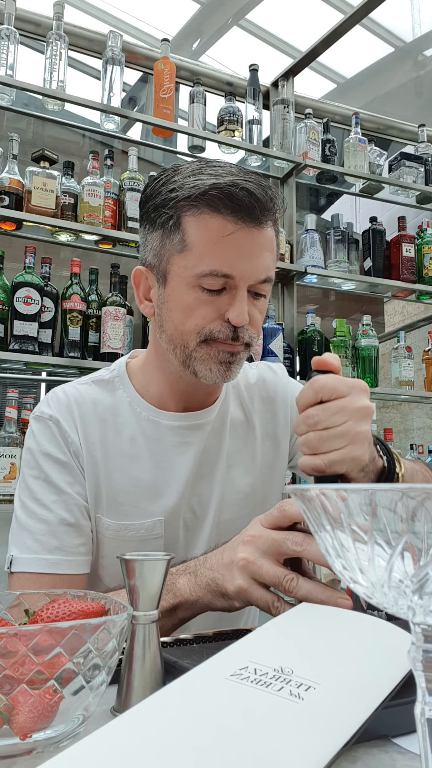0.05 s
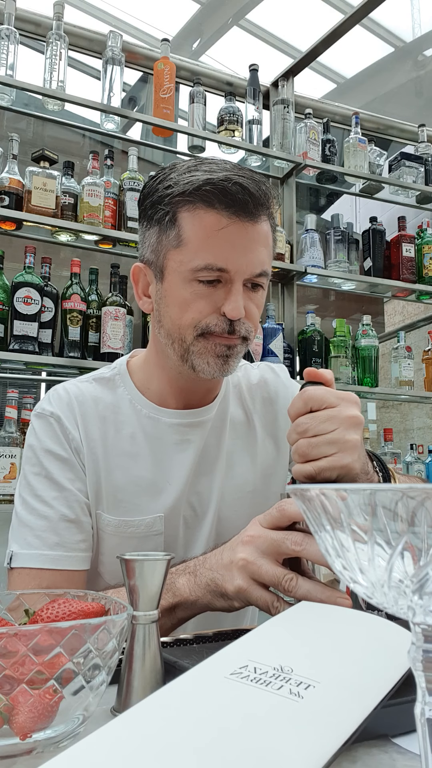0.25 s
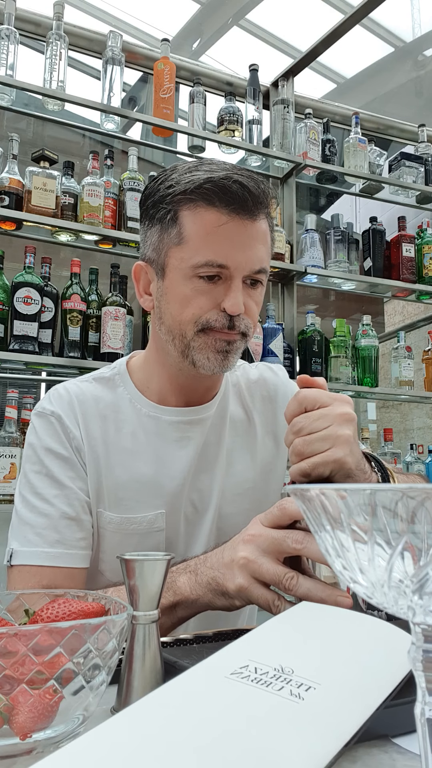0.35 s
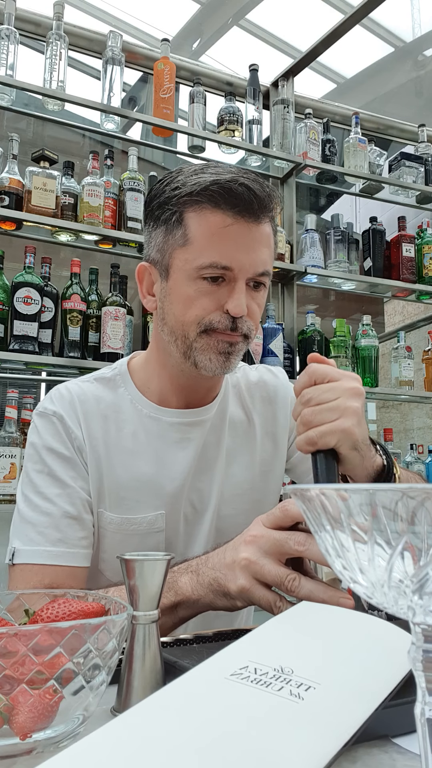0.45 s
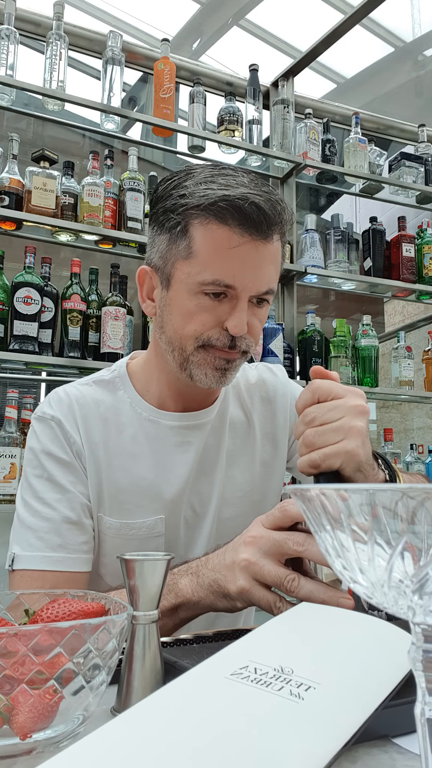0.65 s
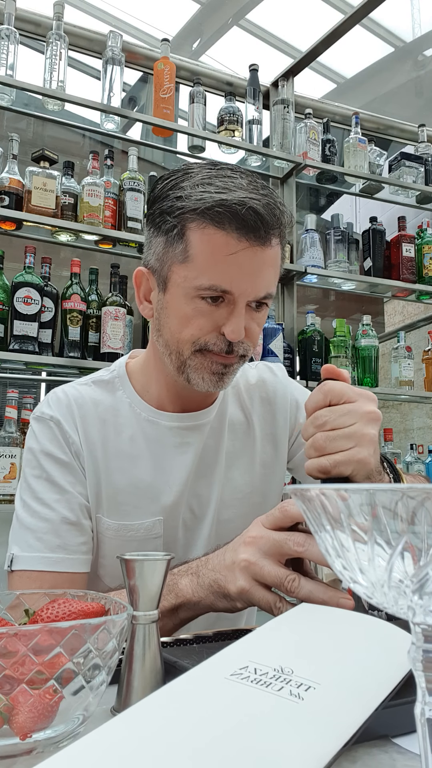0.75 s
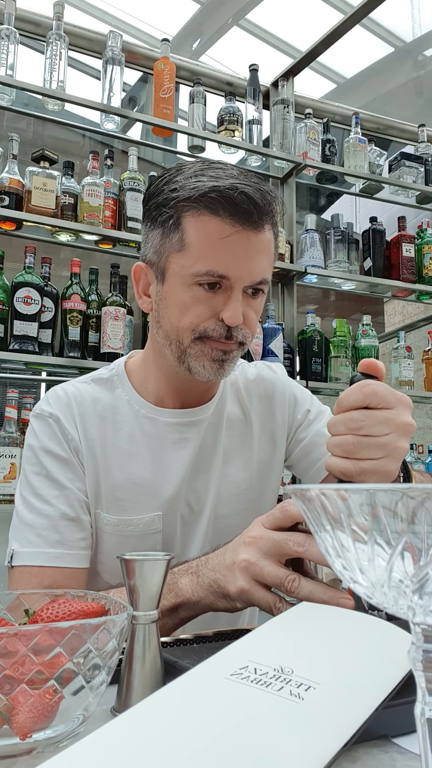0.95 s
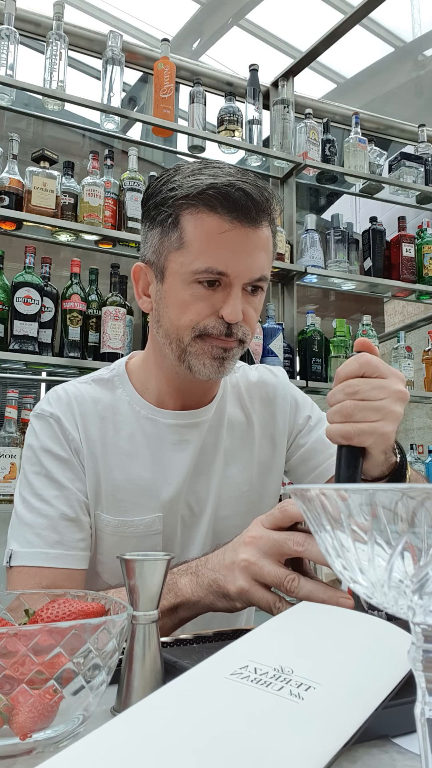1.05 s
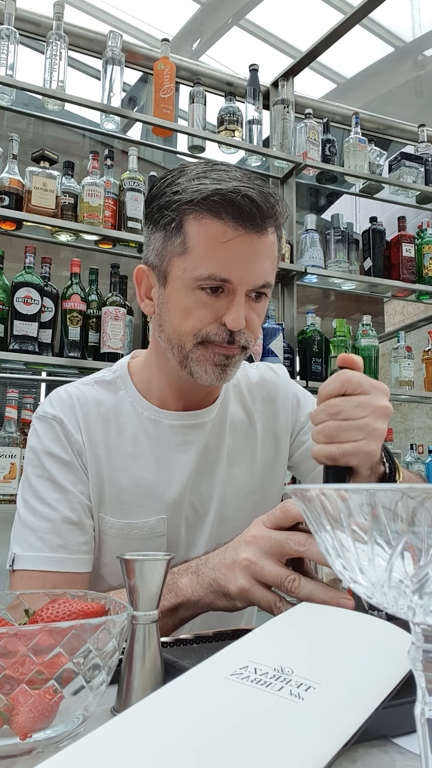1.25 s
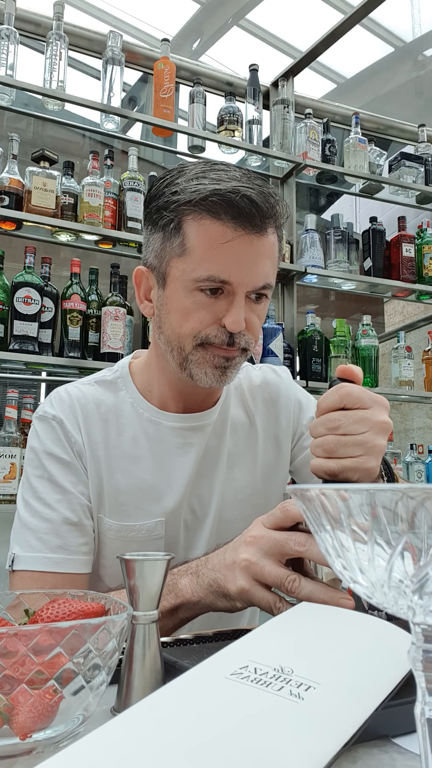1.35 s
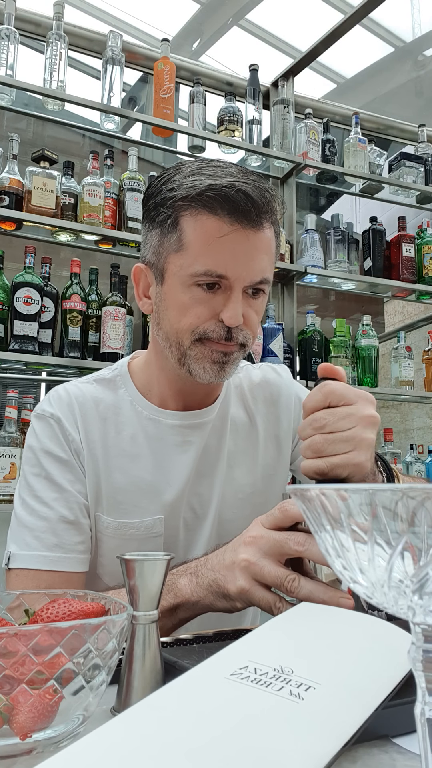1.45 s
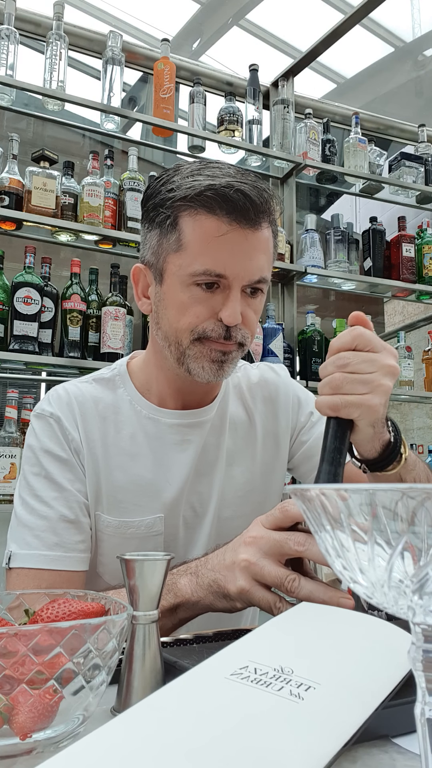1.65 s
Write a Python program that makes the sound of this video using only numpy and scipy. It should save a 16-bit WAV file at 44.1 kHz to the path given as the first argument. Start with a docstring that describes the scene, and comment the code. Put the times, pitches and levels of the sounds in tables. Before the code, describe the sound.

A muddler crushes fruit in a mixing vessel, close and to the right. Light taps at 0.2 seconds lead to a sharp knock at 0.35, a brief squeaky scrape, and the loudest, hollow knock at 0.6. Softer wet taps and low thumps follow from 0.8 to 1.25 seconds, then a soft grinding hiss until about 1.7. A fridge hums faintly in the slightly echoing room.

```python
"""Muddling fruit at a bar

A muddler pounds and grinds strawberries and leaves in a hand-held mixing vessel on a bar counter.
Each impact cracks against the wall and excites its modes and the air cavity; hard pushes thump the
counter, and handling adds a soft rumble. Between knocks, the tool rubs the wet pulp and scrapes the
wall. A fridge hums in the lively room."""
import sys
import numpy as np
from scipy import signal
from scipy.fft import rfft, irfft, next_fast_len
from scipy.io import wavfile

SR = 44100
rng = np.random.default_rng(int(sys.argv[2]) if len(sys.argv) > 2 else 0)


def waveform_to_disk(signal):
    """Save audio, clipped to [-1, 1], as 16-bit WAV at the path in sys.argv[1]."""
    frames = np.transpose(np.atleast_2d(signal))
    scaled = np.clip(frames, -1, 1) * 32767
    samples = np.round(scaled).astype(np.int16)
    wavfile.write(sys.argv[1], SR, samples)


N = 74970
T = np.arange(N) / SR

# Impacts: (time [s], crack level [dB], crack tilt [dB/octave], contact resonance [Hz], snap level [dB],
# cavity level [dB], cavity pitch [Hz], pitch sag [octaves/s], base and squash level [dB])
KNOCKS = [(0.217, -26, -3.5, 1620, -19.5, -20.5, 795, 7.5, -34),
          (0.2520, -27, -6, 2050, -24, -28, 772, -1.5, -31),
          (0.341, -14, 3.5, 3360, -24, -10, 862, 46.5, -13.5),
          (0.3812, -27.5, -5.5, 2800, -52, -24, 833, 14, -25.5),
          (0.4425, -30, 7.5, 2540, -37, -22.5, 788, 9.5, -29),
          (0.5821, -7.5, -2, 1230, -17.5, 4, 802, 0.5, -13.5),
          (0.8125, -32, -5.5, 1130, -38.5, -22, 768, 7.5, -32),
          (0.869, -26.5, -3, 3150, -25.5, -36, 747, 6.5, -36),
          (0.964, -28, -4.5, 1710, -48, -34.5, 862, 23, -55),
          (1.0567, -62, 7, 6000, -33, -62, 805, -24, -59),
          (1.1023, -26.5, -4.5, 1580, -41, -23, 840, 8.5, -28),
          (1.2330, -28.5, 1.5, 4570, -22.5, -20.5, 763, -6, -53),
          (1.2515, -25.5, 6, 4350, -18, -14, 762, -1.5, -31.5)]
# Damped modes of the vessel's base: (frequency [Hz], level [dB], T60 [s])
BASE_MODES = [(354, -13.5, 0.029), (459, -2, 0.0486)]
# Spectra of the crack, the wet snap and the fruit giving way: (frequency [Hz], gain [dB])
CRACK_SPECTRUM = [(300, -15), (900, 0), (1300, -10.5), (1600, 7.5), (2100, 0), (2800, 2), (4400, 1.5),
                  (5600, -1.5), (6600, -2), (8200, -14), (16000, -43)]
SNAP_SPECTRUM = [(3000, -20.5), (6500, -4), (8200, -11.5), (10000, -11.5), (12500, -0.5), (15500, -0.5)]
SQUASH_SPECTRUM = [(80, 0.5), (180, 10), (480, 9.5), (620, 5.5), (1050, 3), (1350, 1), (3000, -43)]
CONTACT_DB, CONTACT_SPAN = 6.5, 1.276   # lift at the resonance; frequency ratio to its edges
WALL_DB, CAVITY_LAG_S = -17.5, 0.00248


def knocks():
    """Impact excitation: a blow drives wall, base and cavity, and crushed fruit adds bursts of noise."""
    out, snaps, squashes = np.zeros((3, N))
    base = sum(from_db(db) * tone(hz, t60) for hz, db, t60 in BASE_MODES)
    wet_decay = decay(t60=0.014) + from_db(-16.5) * decay(t60=0.14)   # snap, then splatter
    for s, crack_db, tilt, contact_hz, snap_db, cavity_db, cavity_hz, sag, base_db in KNOCKS:
        crack_noise, snap_noise, squash_noise = rng.standard_normal((3, N))
        crack = coloured(crack_noise * decay(t60=0.024), CRACK_SPECTRUM)
        crack += from_db(WALL_DB) * wall_ring()
        contact = [(contact_hz / CONTACT_SPAN, 0), (contact_hz, CONTACT_DB),
                   (contact_hz * CONTACT_SPAN, 0)]
        crack = coloured(crack, [(1400, -tilt), (5600, tilt)], contact)
        note = delayed(cavity(cavity_hz, sag), CAVITY_LAG_S)
        out += delayed(from_db(crack_db) * crack + from_db(cavity_db) * note + from_db(base_db) * base, s)
        snaps += from_db(snap_db) * delayed(snap_noise * wet_decay, s)
        squashes += from_db(base_db) * delayed(squash_noise * decay(t60=0.034), s)
    return out + coloured(snaps, SNAP_SPECTRUM) + coloured(squashes, SQUASH_SPECTRUM)


def cavity(hz, sag, rise_s=0.0033, damping=0.65):
    """Cavity resonance: the air swells into a note that sags and chokes if the tool sinks into fruit."""
    octaves = np.clip(sag * T, 0, 4)
    phase = 2 * np.pi * np.cumsum(hz * 2 ** -octaves) / SR
    swell = (1 - np.exp(-T / rise_s)) * np.exp(-damping * octaves ** 2)
    main_mode = np.sin(phase) * decay(t60=0.046)
    lower_mode = from_db(-17) * np.sin(0.9 * phase) * decay(t60=0.11)
    return swell * (main_mode + lower_mode)


# Modes of the vessel's wall: (frequency [Hz], level [dB], T60 [s])
WALL_MODES = [(1480, -3, .05), (1620, -3, .03), (1810, -12, .08), (2290, -11, .08), (2546, -4, .09),
              (2615, -4, .08), (2736, -4, .07), (2970, -8, .04), (3613, -7, .05), (4165, 0, .07),
              (4665, -9, .07), (5020, -9, .04), (5780, -14, .05), (6400, -9, .03)]


def wall_ring(uneven_db=1.5, detune=0.0061):
    """Modal superposition: the contact point weights each mode, and pulp on the wall detunes it."""
    ring = 0
    for hz, db, t60 in WALL_MODES:
        gain = from_db(db + uneven_db * rng.normal()) * rng.choice([-1, 1])
        ring += gain * tone(hz * (1 + detune * rng.normal()), t60)
    return ring


# Low thumps: (time [s], level [dB], frequency [Hz], T60 [s])
THUMPS = [(0.35, -20.5, 145, 0.064), (0.3780, -33.5, 100, 0.23), (0.5840, -28, 166.5, 0.2),
          (0.815, -27, 173, .07), (1.102, -38, 84.4, .4), (1.1400, -37.5, 105.3, 0.39)]


def low_thumps():
    """Damped vibration: pushes on the counter, then a soft, longer handling rumble near 1.1 s."""
    return sum(from_db(db) * delayed(tone(hz, t60), s) for s, db, hz, t60 in THUMPS)


# Course of the rubbing: (time [s], rub level [dB], fizz level [dB])
RUB_LEVELS = [(0, -45, -49), (0.049, -43, -47), (.15, -51, -48.5), (.2, -50, -58), (.32, -56, -60),
              (.4, -44.5, -47), (.5, -67, -61), (.75, -56.5, -73), (.86, -59, -66), (.92, -50.5, -73),
              (1.03, -84, -66), (1.2, -59.5, -88), (1.28, -46.5, -58), (1.42, -64, -77), (1.7, -69, -75)]
# Spectra of rubbed pulp, bursting cells and juice: (frequency [Hz], gain [dB])
PULP_SPECTRUM = [(150, -34), (450, 10), (800, 18), (1150, 7.5), (2200, 9), (2900, 8.5), (3400, 1.5),
                 (4300, 3.5), (5200, -1), (7200, -1.5), (8600, -17), (15000, -23.5)]
CRACKLE_SPECTRUM = [(800, -17), (2500, 2.5), (4500, 0), (6800, 5.5), (9000, -19), (15000, -6.5)]
JUICE_SPECTRUM = [(5000, -88), (8500, -26), (10500, -1), (12500, 1), (15500, 3)]


def pulp():
    """Shot noise: tiny clicks add up as fruit and leaves rub, cells burst and juice fizzes."""
    times, rub_db, fizz_db = np.transpose(RUB_LEVELS)
    rub_level = envelope(times, rub_db)
    crackle = from_db(-3.5) * coloured(grains(per_s=220) * rub_level, CRACKLE_SPECTRUM)
    rub = coloured(grains(per_s=5000) * rub_level, PULP_SPECTRUM)
    fizz = coloured(grains(per_s=5000) * envelope(times, fizz_db), JUICE_SPECTRUM)
    return rub + crackle + fizz


# Strokes along the wall: (peak time [s], rise [s], fall [s], level [dB], squeak frequency [Hz])
SCRAPES = [(.04, 0.013, 0.018, -46, 803), (.05, 0.061, 0.067, -53, 2930), (.38, 0.0093, 0.024, -46, 4700),
           (0.426, 0.0069, 0.0018, -33, 1530), (.434, 0.018, .011, -38, 2387),
           (.433, 0.0032, 0.0061, -35, 4093), (.505, 0.02, .03, -59, 2580),
           (0.983, 0.0034, 0.017, -51.5, 1770)]


def scrapes(linewidth_hz=35, rasp_db=-3):
    """Stick-slip friction: each stroke squeaks on one resonance, over a rasp of dense slips."""
    out = 0
    for s, rise, fall, db, hz in SCRAPES:
        width = np.where(T < s, rise, fall)
        pressure = from_db(db) * np.exp(-.5 * ((T - s) / width) ** 2)
        phase_drift = np.cumsum(rng.standard_normal(N)) * np.sqrt(2 * np.pi * linewidth_hz / SR)
        squeak = np.sqrt(2) * np.sin(2 * np.pi * hz * T + phase_drift)
        rasp = coloured(pressure * grains(per_s=1800), PULP_SPECTRUM)
        out += pressure * squeak + from_db(rasp_db) * rasp
    return out


# Course of the twisting hiss: (time [s], level [dB])
TWIST_LEVELS = [(1.2, -60), (1.33, -49.5), (1.45, -47.5), (1.56, -50), (1.7, -51)]
# Its spectrum: (frequency [Hz], gain [dB])
TWIST_SPECTRUM = [(300, -11), (750, 7), (1150, -10.5), (2100, 0.5), (2900, 6.5), (3300, -3.5), (4300, -2.5),
                  (5200, -3), (6000, -5.5), (7700, 1.5), (8600, -25.5), (15000, -18)]


def twist():
    """Sliding friction: a soft, even hiss as the tool turns in the mash."""
    return coloured(rng.standard_normal(N) * envelope(*np.transpose(TWIST_LEVELS)), TWIST_SPECTRUM)


# Course of the hum: (time [s], level [dB])
HUM_LEVELS = [(0.0, -38), (0.084, -36), (0.316, -35.5), (0.378, -41), (0.866, -38), (1.116, -53),
              (1.174, -50), (1.296, -41.5), (1.472, -44), (1.7, -56)]
# Its partials: (multiple of the shaft rate, level [dB])
HUM_PARTIALS = [(2, 0), (3, -15.5), (4, -25), (6, -36.5), (7, -20), (8, -25.5), (9, -23.5)]


def fridge(shaft_hz=23.35):
    """Periodic forcing: a compressor hums on harmonics of its shaft rate."""
    hum = sum(from_db(db) * np.sin(2 * np.pi * (k * shaft_hz * T + rng.random()))
              for k, db in HUM_PARTIALS)
    return envelope(*np.transpose(HUM_LEVELS)) * np.sqrt(2) * hum


# Reverberation times of the room: (frequency [Hz], T60 [s])
ROOM_T60 = [(100, 0.92), (400, 0.57), (800, 0.54), (2000, 0.51), (5000, 0.53), (10000, 0.41), (15000, 0.38)]


def room(x, delay_s=0.0043, rise_s=0.0043):
    """Reverberation: convolution with a diffuse tail that dies sooner in the treble."""
    noise = rfft(diffuse())
    hz = np.arange(noise.shape[1]) * SR / N
    tail = 0
    for k, (_, t60) in enumerate(ROOM_T60):
        band = at_hz([(f, j == k) for j, (f, _) in enumerate(ROOM_T60)], hz)
        tail += irfft(noise * band, N) * decay(t60)
    tail *= np.clip((T - delay_s) / rise_s, 0, 1)
    return signal.fftconvolve(x[None], tail / np.linalg.norm(tail[1]), axes=1)[:, :N]


# Coherence of the diffuse field: (frequency [Hz], left-right correlation)
COHERENCE = [(60, 1), (300, 0.99), (700, 0.78), (1500, 0.033), (12000, 0.016)]


def diffuse():
    """Spatial coherence: white stereo noise, alike in the bass and unrelated in the treble."""
    mid, side = rfft(rng.standard_normal((2, N)))
    alike = at_hz(COHERENCE, np.arange(len(mid)) * SR / N)
    return irfft(np.sqrt(1 + alike) * mid + np.sqrt(1 - alike) * side * [[1], [-1]], N) / np.sqrt(2)


def from_db(db):
    """Amplitude ratio of a level in decibels."""
    return 10 ** (np.asarray(db) / 20)


def envelope(times, db):
    """Amplitude envelope, interpolated in decibels."""
    return from_db(np.interp(T, times, db))


def at_hz(points, hz):
    """Interpolation on a log-frequency axis."""
    f, value = np.transpose(points)
    return np.interp(np.log(np.maximum(hz, 1)), np.log(f), value)


def coloured(x, *responses):
    """Minimum-phase filtering by a cascade of (frequency [Hz], gain [dB]) responses."""
    size = 2 * next_fast_len(N // 2 + SR // 10, real=True)
    hz = np.arange(size // 2 + 1) * SR / size
    gain = from_db(sum(at_hz(points, hz) for points in responses))
    cepstrum = irfft(np.log(gain))
    cepstrum[1:size // 2] *= 2   # folding onto positive time makes the filter causal
    cepstrum[size // 2 + 1:] = 0
    return irfft(rfft(x, size) * np.exp(rfft(cepstrum)))[..., :N]


def decay(t60):
    """Exponential decay by 60 dB in t60 seconds."""
    return np.exp(-np.log(1000) * np.minimum(T / t60, 10))


def tone(hz, t60):
    """Impulse response of one damped mode."""
    return np.sin(2 * np.pi * hz * T) * decay(t60)


def delayed(x, s):
    """Pure delay of s seconds."""
    return np.pad(x, (round(s * SR), 0))[:N]


def grains(per_s, spread_db=4):
    """Poisson process: random clicks of uneven size, at unit rms."""
    sizes = from_db(spread_db * np.minimum(rng.exponential(1, N), 4)) * rng.choice([-1, 1], N)
    clicks = sizes * (rng.random(N) < per_s / SR)
    return clicks / np.sqrt(np.mean(clicks ** 2) + 1e-20)


# Responses of the direct and indirect paths to the left, and the far wall: (frequency [Hz], gain [dB])
LEFT_DIRECT = [(60, -9), (150, -2.5), (400, -4), (800, -10.5), (1400, -10), (2700, -14.5), (5000, -9.5),
               (9000, -20.5), (13000, -22)]
LEFT_INDIRECT = [(60, -4.5), (200, -3.5), (400, 0), (800, -14), (1400, -1), (2700, -6), (5000, -7),
                 (9000, -4.5), (13000, -13)]
FAR_WALL = [(300, 4), (800, -7), (1500, -4), (6000, -10)]
# Spectrum of the room's background noise: (frequency [Hz], gain [dB])
AMBIENT_SPECTRUM = [(25, -31), (60, 9), (100, -1.5), (180, -3), (300, -5.5), (500, -17), (900, -21),
                    (2000, -32.5), (4500, -44), (7500, -53), (9500, -52), (15000, -44)]


def scene():
    """Superposition: the vessel close by on the right, two reflections, the room and the fridge."""
    vessel = knocks() + low_thumps() + scrapes() + pulp() + twist()
    counter_echo = from_db(-9) * coloured(delayed(vessel, s=0.0095), LEFT_INDIRECT)
    wall_echo = from_db(-21.5) * coloured(delayed(vessel, s=0.14), FAR_WALL)
    around = from_db(-12) * room(vessel) + from_db(-29.5) * coloured(diffuse(), AMBIENT_SPECTRUM)
    left_direct = coloured(delayed(vessel, s=0.00007), LEFT_DIRECT)
    left = left_direct + counter_echo + coloured(around[0], LEFT_INDIRECT)
    right = vessel + wall_echo + around[1]
    return np.array([left, right]) + fridge()


def record(dry, ceiling=0.8, cutoff_hz=15800):
    """Soft saturation rounds the highest peaks, and a steep low-pass filter cuts the top."""
    rounded = dry / (1 + (dry / ceiling) ** 6) ** (1 / 6)
    return signal.sosfilt(signal.ellip(10, .1, 80, cutoff_hz, fs=SR, output="sos"), rounded)


dry = scene()
out = record(dry)
waveform_to_disk(out)
```